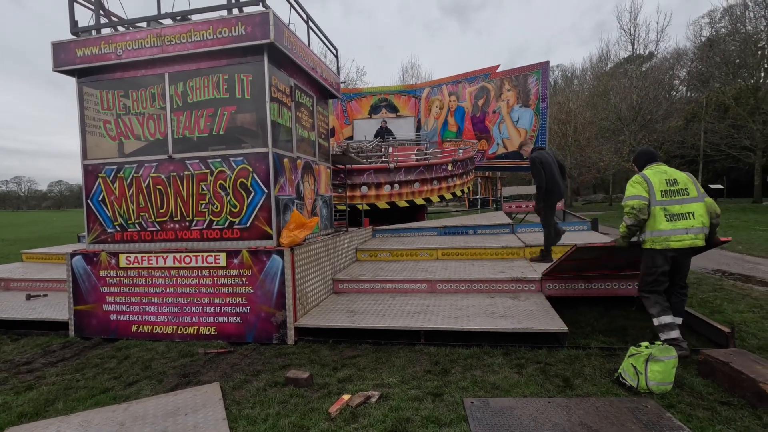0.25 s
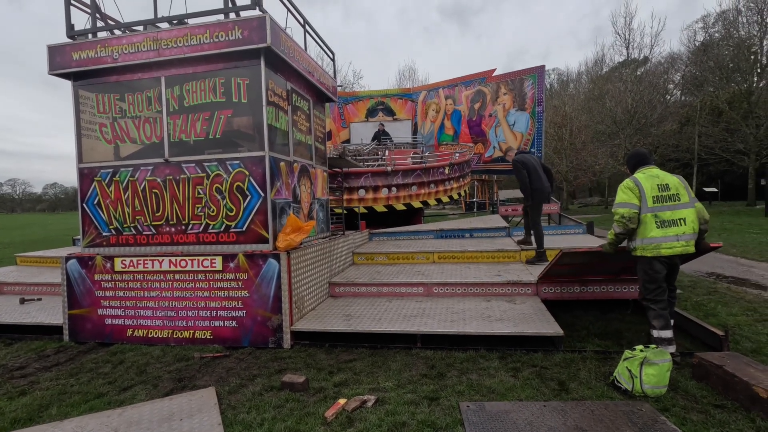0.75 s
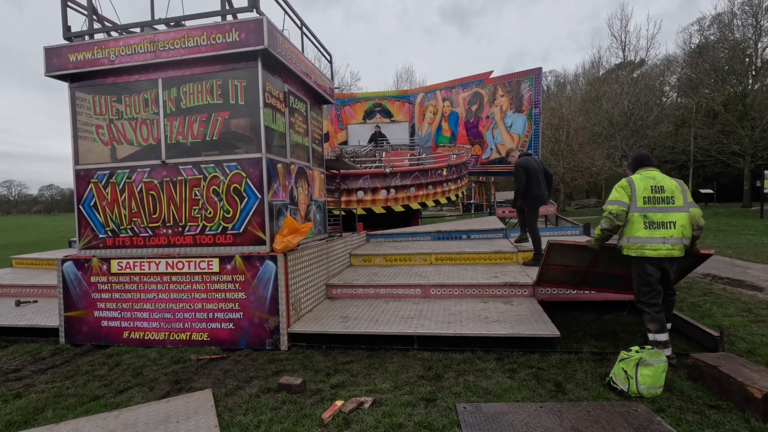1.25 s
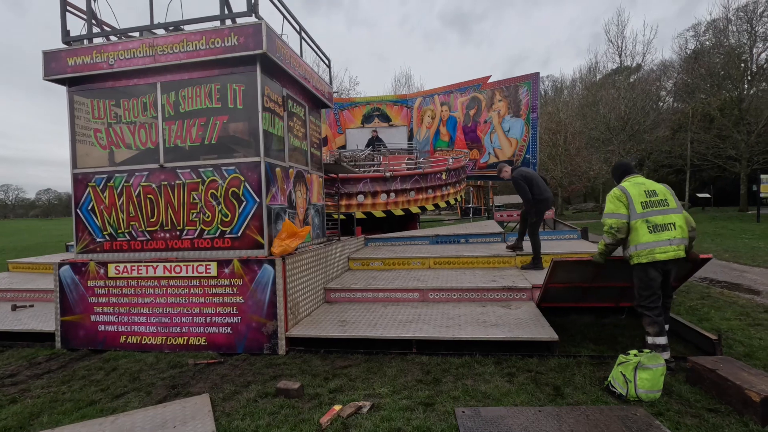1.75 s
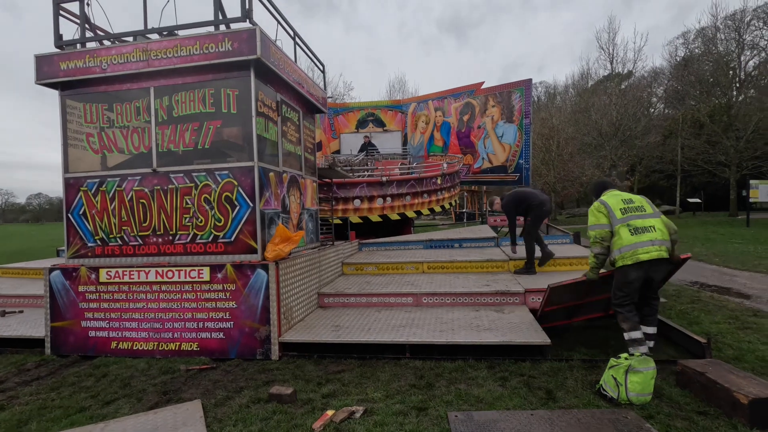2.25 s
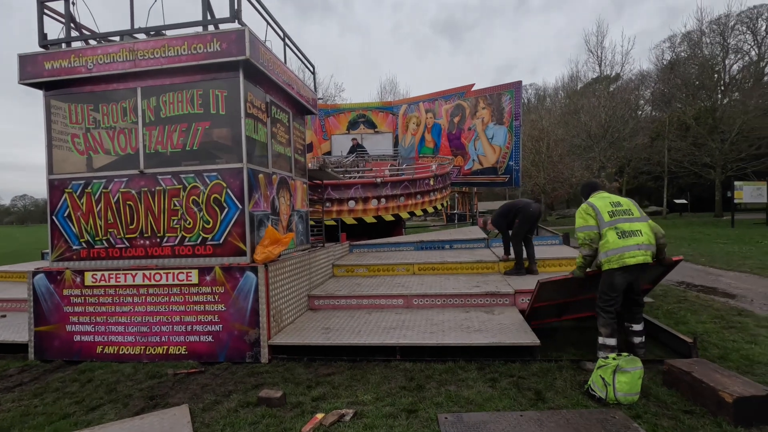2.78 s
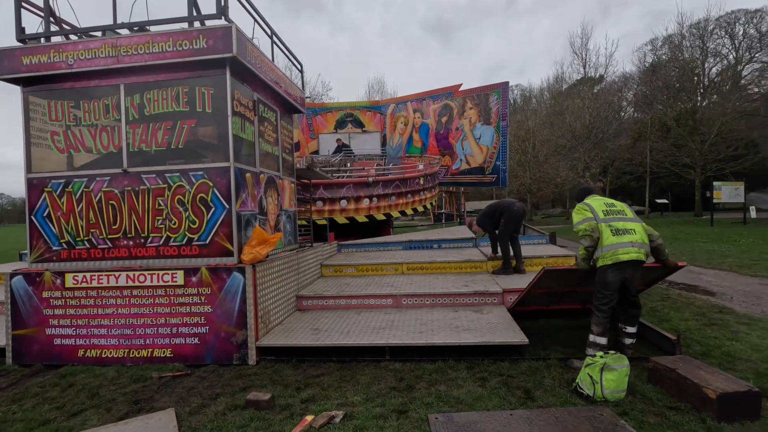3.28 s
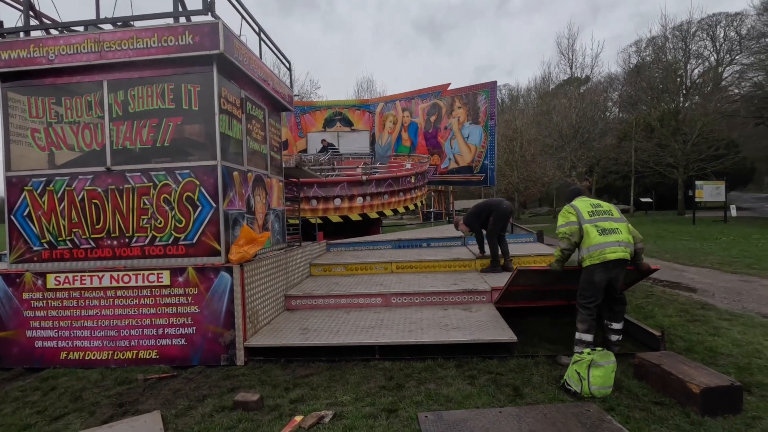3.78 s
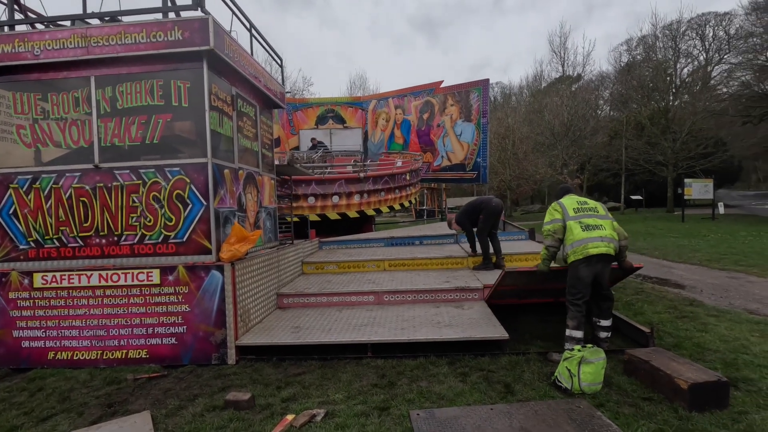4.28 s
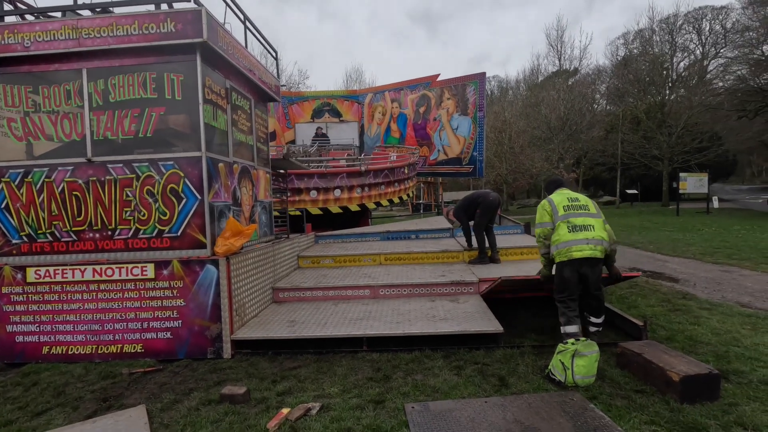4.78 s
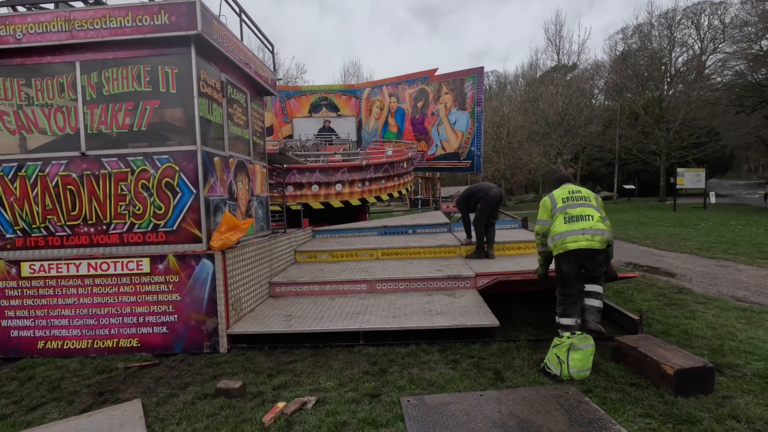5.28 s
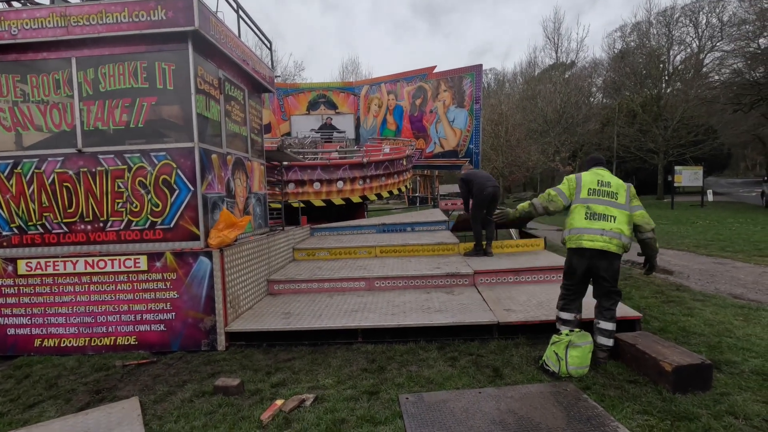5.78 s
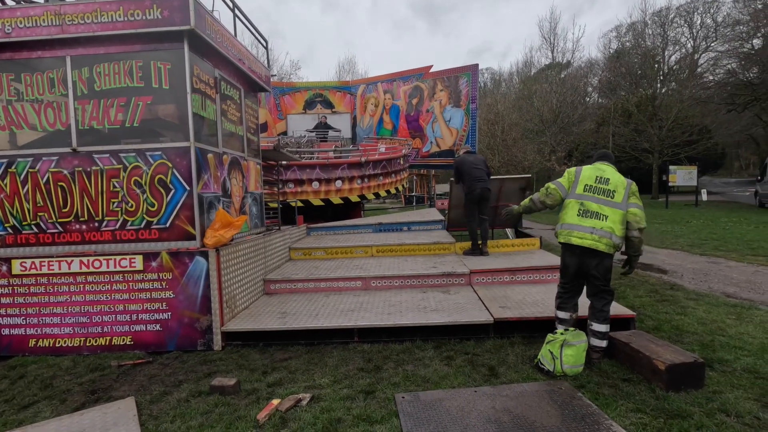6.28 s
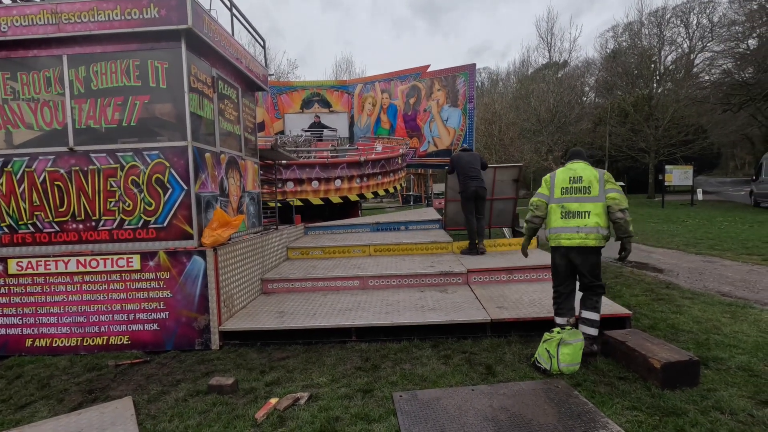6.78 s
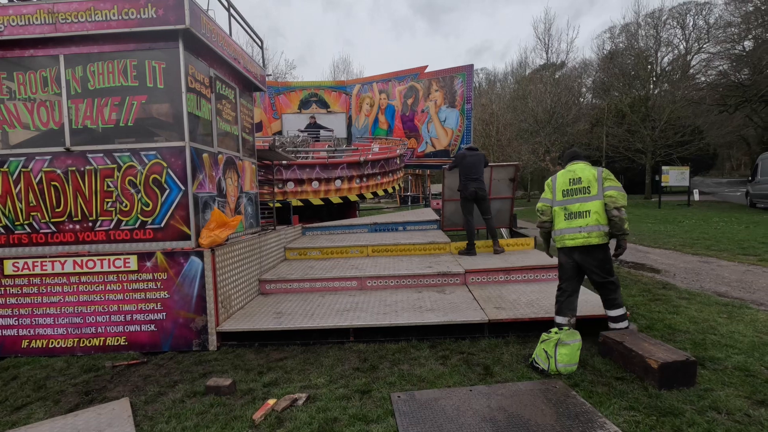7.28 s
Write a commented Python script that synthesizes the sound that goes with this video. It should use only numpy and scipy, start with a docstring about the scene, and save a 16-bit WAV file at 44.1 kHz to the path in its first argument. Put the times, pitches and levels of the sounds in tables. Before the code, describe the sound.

Steel deck plates are handled in front of a stereo microphone in an open park, over a low rumble of distant traffic and a faint, steady motor whine. Each knock booms, rings and chatters briefly, with short echoes off a fairground ride's walls. A loud bang comes at 0.6 seconds, then a cluster of clangs from about 1.4 to 2.2 seconds. A joint gives one short squeak at 2.6 seconds. Knocks resume at 3.5 seconds, bunch around 4.1 to 4.3, and hit hard at 4.7. A very faint, thin bird whistle slides down at 4.5 seconds. The sound, centred until now, widens from about 5 seconds. A sharp crash at 5.6 seconds starts a busy clatter that dies away by 6.7, with a loose pin rattling twice around 6.5. Two soft, low thuds follow at 7.3 seconds.

```python
"""Open park, a stereo microphone facing a fairground ride where workers drop and shove steel deck plates
into place. Far traffic and a faint motor whine run throughout. From the first second, each knock sets a
loose plate chattering, booming and ringing, with echoes off the ride's walls. A joint squeaks at 2.6 s,
the knocks resume, and at 4.5 s a small bird whistles from the trees. The image then opens out, a pin
rattles twice around 6.5 s, and two soft thuds end the work at 7.3 s."""
import sys
import numpy as np
from scipy import signal
from scipy.fft import rfft, irfft
from scipy.io import wavfile
from scipy.ndimage import uniform_filter1d

SR = 44100
rng = np.random.default_rng(int(sys.argv[2]) if len(sys.argv) > 2 else 0)


def wrap_up_sound(samples):
    """Save the sound to the file named by the first command line argument, as 16-bit audio."""
    columns = np.atleast_2d(samples).T
    # keep every value between -1 and 1, then stretch to whole-number steps
    tamed = np.clip(columns, -1, 1)
    steps = np.round(tamed * 32767).astype(np.int16)
    wavfile.write(sys.argv[1], SR, steps)


N = 332822

# Knocks on the deck: t/s, clang level/dB, boom, body and rim ring (each /dB re clang), settling time/s
KNOCKS = [(0.083, -51, 19, 15.5, -20, 0.092), (0.135, -58, 15, 20, -20, 0.1),
          (0.606, -19.5, 5, 0, -10, 0.4), (0.695, -37, 12, 4, -8, 0.2), (0.729, -42, 5, 3, 1, 0.3),
          (1.084, -43.5, -6, 0, -10, 0.14), (1.152, -47, 14.5, 9, -8, 0.33),
          (1.188, -46.5, 20.5, 7.5, -20, 0.51), (1.314, -40, 3, -24, 0, 0.47),
          (1.341, -44, -5, -21, -2, 0.26), (1.378, -40, -2, -13, -6, 0.2), (1.394, -20, 9, 0, -24, 0.46),
          (1.547, -26, 7.5, -2, -18, 0.23), (1.613, -24, 9, 1, -21, 0.27),
          (1.633, -24.5, 0, -1.5, 4.5, 0.78), (1.708, -28.5, 10.5, 1, -9, 0.57),
          (1.856, -26, 9, 0, -4, 0.41), (1.943, -37.5, 8.5, -3, 2, 0.63), (2.196, -35, 11, 2.5, -2.5, 0.15),
          (2.441, -51, -3, 10, -10, 0.4), (3.453, -28, 4, -0.5, 0, 0.3), (3.497, -37, 13, 6, 1, 0.22),
          (3.544, -48, 19, 7.5, 1, 0.9), (3.907, -51, 23, 14, -20, 0.27),
          (3.928, -43.5, 16.5, 4, -20, 0.45), (4.048, -43.5, 15.5, 3.5, -20, 0.56),
          (4.098, -26, 11.5, 6, -20, 0.26), (4.159, -30.5, 15.5, -1, 0.5, 0.17),
          (4.218, -41, 15, 0, -6, 0.55), (4.265, -27.5, 10.5, 1.5, -0.5, 0.27),
          (4.353, -53.5, 21, -9, -1, 0.43), (4.717, -21.5, 3.5, -2, -5, 0.42), (4.783, -28, 11, 0, 2, 0.12),
          (4.848, -40.5, 8, 5, -8, 0.091), (5.018, -35.5, -2, 4, -17, 0.27),
          (5.068, -44.5, 6, 1.5, -20, 0.54), (5.275, -49, 6, -9, -18, 0.35),
          (5.424, -48, 17, -13.5, -20, 0.11), (5.555, -46.5, 14, -15, -11, 0.76),
          (5.61, -19, 4, -12, -18, 0.38), (5.626, -19, -1, 0, 7, 0.33), (5.718, -32, 3.5, 1.5, -9, 1),
          (5.832, -31, 0, 4, -9, 0.99), (5.894, -24, 4, 1.5, 1, 0.41), (5.957, -32, -10, 5, -19, 0.52),
          (6.08, -31.5, 1, 1, -4, 0.37), (6.113, -34, 1.5, 5.5, -20, 0.17), (6.196, -36, 5.5, 0, -15, 0.37),
          (6.221, -41.5, 1, -2.5, -3, 0.28), (6.334, -49, 4, 17, -4, 0.14),
          (6.364, -42.5, 4, 0.5, -1, 0.23), (6.489, -35, -8, 2, -20, 0.15), (6.55, -48, 0, 3, -5, 0.3),
          (6.596, -44, 11, 4, -22, 0.38), (6.654, -54, 11, 10.5, -22, 0.75),
          (7.276, -64.5, 32, 22, -20, 0.16), (7.314, -64, 33, 19, -20, 0.21)]
# Colour of the steel's clang: f/Hz, level/dB
CLANG_SPECTRUM = [(880, -30), (1500, -2.5), (1770, -6), (2070, -6), (2490, -5.5), (4480, -7.5),
                  (6370, -22.5), (10200, -34.5), (13300, -66), (14500, -51), (15500, -62)]
# Ring time of the plate modes: f/Hz, t60/s
MODE_DECAY = [(60, 0.063), (300, 0.075), (1000, 0.05), (4000, 0.019), (12000, 0.068)]
# Boom of the whole sheet, its pitch set by how it is propped: from t/s, f/Hz
BOOM_PITCH = [(0, 220), (1.0, 150), (3.0, 230), (4.0, 160), (4.5, 244), (4.9, 150), (5.6, 209), (5.7, 160)]
# Jolts to a loose pin: t/s, level/dB
RATTLES = [(6.365, -33), (6.552, -38)]
# Partials of the joint: multiple of SQUEAK_HZ, level/dB re SQUEAK_DB, t60/s
SQUEAK_PARTIALS = [(1, -2.5, 0.098), (2, -5.5, 0.16), (4, -28, .08)]
# Bird's glide, sung 2 % below these pitches: t/s, length/s, first f/Hz, last f/Hz, level/dB
BIRD_GLIDES = [(4.522, 0.28, 5040, 4800, -69)]
# Partials of the motor: multiple of MOTOR_HZ, level/dB
MOTOR_PARTIALS = [(8, -68), (10, -73), (11, -78), (12, -70), (13, -80), (15, -77), (16, -86), (18, -79.5),
                  (19, -83), (20, -89), (21, -78.5), (22, -89), (24, -84), (26, -84), (27, -85),
                  (29, -83.5)]
# Colour of the far traffic: f/Hz, relative level/dB
TRAFFIC_SPECTRUM = [(12, -18), (20, -7.5), (59, 0), (153, -7), (213, -10), (232, -19.5), (289, -13),
                    (382, -26.5), (881, -31.5), (1340, -39), (2210, -47), (2400, -48.5), (2920, -47.5),
                    (6190, -61.5), (15500, -80.5)]
# Swell of the far traffic: t/s, level/dB, extra lift from 600 Hz up/dB
TRAFFIC_SWELL = [(0.0, -26, 9.5), (0.1, -28.5, 6.5), (1.16, -31, 7), (1.64, -24.5, 13.5), (2.46, -31, 2),
                 (3.19, -29, 3), (3.91, -29, 3.5), (4.2, -28.5, 2), (5.0, -32.5, 6), (5.78, -29, 4.5),
                 (6.62, -31, 4.5), (6.85, -26.5, -0.5), (7.12, -32, 2.5), (7.55, -28, 4)]
# Dying time of the wall echoes: f/Hz, t60/s
ECHO_DECAY = [(200, 0.53), (2000, 0.15), (10000, 0.26)]
# Phase between the microphone's ports, before the width gain: f/Hz, approximate left lead/rad
LEFT_LEAD = [(150, -0.18), (1000, -0.34), (2500, -0.87), (4500, -1.26), (8000, -0.86)]
# Diffuse sound in the side signal, before the width gain: f/Hz, level/dB
DIFFUSE_SIDE = [(40, -9), (150, -20), (1000, -11), (2500, -26), (8000, 3.5)]
# Width gain on the side signal: t/s, level/dB
STEREO_WIDTH = [(0, -58), (4.4, -41), (5.1, -7), (6.8, 0.5), (7.55, -22)]

CHATTER_HOLD = 0.046  # share of the settling time before the chatter falls steeply
RIM_HZ, RIM_WIDTH_HZ = 4425, 360  # the struck edge rings here
RIB_HZ, RIB_WIDTH_HZ, RIB_DB = 2080, 220, -8  # a stiffening rib rings along with the body
RATTLE_HZ, RATTLE_GAP_S, RATTLE_T60_S = 4350, 0.013, .025
SQUEAK_S, SQUEAK_HZ, SQUEAK_DB, SQUEAK_RISE_S = 2.626, 600, -25, 0.018
MOTOR_HZ = 283
WIDE_HZ, CUTOFF_HZ = 11400, 15100  # left and right always differ above the first; the second ends the top


def deck_plates():
    """In front of the microphone: each blow and its re-contacts ring a steel plate at three spots."""
    hz, modes = plate_modes(count=600)
    out, t, size = np.zeros(N), np.arange(11800) / SR, 2 ** 14
    bass, treble = hz < 500, hz > 7000
    for s, db, boom_db, body_db, rim_db, settle_s in KNOCKS:
        strength = mode_strengths(hz, s, boom_db, body_db)
        spots = strength * rng.choice([-1, 1], (3, len(hz))) * rng.uniform(.6, 1.4, (3, len(hz)))
        drive = chatter(t, settle_s)
        sway = drive * (1 - np.exp(-t / 0.007))  # the whole sheet needs time to start booming
        drive[:, [0, 90, 200]] += np.diag([2., 5., 6.])  # a faint lead-in softens the start of each knock
        sharp = drive * gain_of(-80 * t)  # later contacts are softer and excite less treble
        spectrum = 0
        for force, band in [(sway, bass), (drive, ~bass & ~treble), (sharp, treble)]:
            spectrum += (rfft(force, size) * rfft((spots * band) @ modes, size)).sum(0)
        strikes = rfft(sharp[0] * gain_of(-150 * t) + 18 * (t == t[90]), size)
        rings = [(RIM_HZ, RIM_WIDTH_HZ, rim_db), (RIB_HZ, RIB_WIDTH_HZ, RIB_DB + min(body_db, 8))]
        for ring_hz, width_hz, ring_db in rings:
            cluster = np.exp(-((hz - ring_hz) / width_hz) ** 2) * spots[0]  # a few neighbouring modes
            spectrum += gain_of(ring_db) * strikes * rfft(cluster @ modes / np.linalg.norm(cluster), size)
        add(out, s, gain_of(db) * irfft(spectrum, size))
    return out


def plate_modes(count):
    """A thin plate has densely packed modes; each is a dying sine of energy 1."""
    hz = 50 + 15000 * ((np.arange(count) + rng.random(count)) / count) ** 1.4
    t = np.arange(4500) / SR
    modes = gain_of(-60 * t / at_hz(MODE_DECAY, hz)[:, None]) * np.sin(2 * np.pi * hz[:, None] * t)
    return hz, modes / np.linalg.norm(modes, axis=1)[:, None]


def mode_strengths(hz, s, boom_db, body_db):
    """How hard the knock at s seconds drives each mode: low boom, middle body, high clang."""
    boom_hz = [f for start, f in BOOM_PITCH if start <= s][-1]
    boom = [(boom_hz / 4, boom_db - 12.5), (boom_hz / 1.67, boom_db + 9),
            (boom_hz, boom_db + 12), (boom_hz * 1.556, boom_db + 7.5)]
    body = [(520, body_db + 1), (760, body_db + 2.5), (950, body_db + 4), (1200, body_db - 2.5)]
    clang = [(f, db) for f, db in CLANG_SPECTRUM if f >= 1500]
    strength = gain_of(at_hz(boom + body + clang, hz)) * np.sqrt(np.gradient(hz))
    return strength / np.linalg.norm(strength[(hz > 1500) & (hz < 8000)])


def chatter(t, settle_s):
    """A loose plate re-contacts at three spots, each about 500 times a second, fading as it settles."""
    sizes = gain_of(2.4 * np.minimum(rng.exponential(1, (3, len(t))), 4))
    contacts = sizes * (rng.random(sizes.shape) < 500 / SR)
    settling = np.maximum(t / settle_s - CHATTER_HOLD, 0) ** 1.103
    envelope = (1 - np.exp(-t / 0.002)) * gain_of(-60 * settling - 28.3 * t)
    force = contacts * rng.choice([-1, 1], contacts.shape) * envelope
    force /= np.linalg.norm(force, axis=1, keepdims=True) + 1e-9
    return force * np.linalg.norm(envelope) / np.sqrt(3)


def loose_pin():
    """On the ride, a jogged pin bounces three times in its hole: short pings of three close modes."""
    out, t = np.zeros(N), np.arange(900) / SR
    for s, db in RATTLES:
        for bounce in range(3):
            hz = RATTLE_HZ * rng.uniform(.9, 1.1, (3, 1))
            ping = gain_of(db - 60 * t / RATTLE_T60_S) * np.sin(2 * np.pi * hz * t).mean(0)
            add(out, s + bounce * RATTLE_GAP_S, ping)
    return out


def joint_squeak():
    """On the ride, a joint sticks and slips with a thin scrape on top; the second partial rings on."""
    t = np.arange(0, .2, 1 / SR)
    shake, uneven, grit = rng.standard_normal((3, len(t)))
    shake = unit_rms(uniform_filter1d(uniform_filter1d(shake, 150), 60))
    turns = np.cumsum(SQUEAK_HZ * (1 + 0.0086 * shake)) / SR
    rise, after = np.minimum(t / SQUEAK_RISE_S, 1), np.maximum(t - SQUEAK_RISE_S, 0)
    slips = sum(gain_of(db - 60 * after / t60) * np.sin(2 * np.pi * k * turns)
                for k, db, t60 in SQUEAK_PARTIALS)
    slips *= 1 + 0.2 * unit_rms(uniform_filter1d(uniform_filter1d(uneven, 90), 60))  # uneven in size
    scrape = signal.sosfilt(signal.butter(10, [1800, 5100], "band", fs=SR, output="sos"), grit)
    return gain_of(SQUEAK_DB) * rise * (slips + gain_of(-13.5 - 60 * after / .1) * scrape)


def wall_echoes(x):
    """Sparse echoes off the ride's walls; the bass lasts longest."""
    taps = np.zeros(SR // 2)
    slots = np.arange(400, SR // 2 - 20, 20)
    taps[slots + rng.integers(0, 20, len(slots))] = rng.choice([-1., 1.], len(slots))
    hz, t, spectra = signal.stft(taps, SR, nperseg=256)
    decay = gain_of(-60 * t / at_hz(ECHO_DECAY, hz)[:, None])
    tail = signal.istft(spectra * decay, SR, nperseg=256)[1]
    return signal.fftconvolve(x, tail / np.linalg.norm(tail))[:N]


def bird():
    """Off in the trees, a small bird gives a thin, faint whistle that slides down."""
    out = np.zeros(N)
    for s, length, first_hz, last_hz, db in BIRD_GLIDES:
        add(out, s, tone([(s, first_hz, db), (s + length, last_hz, db)], [(0.98, 0)], wobble=.012))
    return out


def motor_whine():
    """Faint behind the work, a motor whines in high harmonics of a nearly steady pitch."""
    return tone([(0, MOTOR_HZ, 0), (N / SR + 0.086, MOTOR_HZ, 0)], MOTOR_PARTIALS, wobble=0.0004)[:N]


def far_traffic():
    """Traffic and engines far across the park: low noise that swells, with drifting patches of colour."""
    frames, hz = N // 256 + 5, np.fft.rfftfreq(1024, 1 / SR)
    t = np.arange(frames) * 256 / SR
    real, imag, patches = rng.standard_normal((frames, 513, 3)).T
    patches_db = 0.99 * unit_rms(uniform_filter1d(uniform_filter1d(patches, 10, 0), 14, 1))
    spectra = (real + 1j * imag) * gain_of(at_hz(TRAFFIC_SPECTRUM, hz)[:, None] + patches_db)
    rms = np.sqrt(np.mean(signal.istft(spectra[:, :300], nperseg=1024, noverlap=768)[1] ** 2))
    s, level_db, lift_db = np.transpose(TRAFFIC_SWELL)
    lift = np.interp(t, s, lift_db) * np.clip(np.log2(hz / 300 + 1e-9), 0, 1)[:, None]
    spectra *= gain_of(np.interp(t, s, level_db) + lift) / rms
    return signal.istft(spectra, nperseg=1024, noverlap=768)[1][:N]


def tone(path, partials, wobble):
    """Slightly unsteady partials (multiple, level/dB) along a path of (t/s, f/Hz, level/dB)."""
    s, hz, db = np.transpose(path)
    t = np.arange(s[0], s[-1], 1 / SR)
    shake = unit_rms(uniform_filter1d(rng.standard_normal(len(t)), 150))
    turns = np.cumsum(np.interp(t, s, hz) * (1 + wobble * shake)) / SR
    stack = sum(gain_of(level) * np.sin(2 * np.pi * k * turns) for k, level in partials)
    return np.sqrt(2) * gain_of(np.interp(t, s, db)) * stack * signal.windows.tukey(len(t), .2)


def gain_of(db):
    """Decibels to gain."""
    return 10 ** (np.asarray(db) / 20)


def unit_rms(x):
    """Scales to rms 1."""
    return x / np.sqrt(np.mean(x ** 2) + 1e-20)


def at_hz(points, hz):
    """Reads a table on a log-frequency axis."""
    f, value = np.transpose(points)
    return np.interp(np.log(hz + 1), np.log(f + 1), value)


def add(mix, s, sound):
    """Mixes a sound in at s seconds."""
    part = mix[round(s * SR):][:len(sound)]
    part += sound[:len(part)]


def scene():
    """One channel for what stands in front of the microphone, one for the diffuse park around it."""
    near = deck_plates() + loose_pin()
    add(near, SQUEAK_S, joint_squeak())
    front = near + motor_whine() + gain_of(-14.5) * wall_echoes(near) + bird() + far_traffic()
    diffuse = gain_of(-16) * wall_echoes(near) + far_traffic()
    return np.array([front, diffuse])


def record(dry):
    """Stereo microphone: left and right are front plus and minus side; gain control squeezes bangs."""
    hz, t, (front, diffuse) = signal.stft(dry, SR, nperseg=512)
    side = 1j * np.sin(at_hz(LEFT_LEAD, hz) / 2)[:, None] * front
    side += gain_of(at_hz(DIFFUSE_SIDE, hz))[:, None] * diffuse
    side *= gain_of(np.interp(t, *np.transpose(STEREO_WIDTH)))
    scattered = front * np.exp(2j * np.pi * rng.random(front.shape)) * gain_of(2)
    side = np.where(hz[:, None] > WIDE_HZ, scattered, side)
    ports = signal.istft(np.array([front + side, front - side]), SR, nperseg=512)[1][:, :N]
    power_db = 10 * np.log10(abs(uniform_filter1d((ports ** 2).mean(0), 300)) + 1e-12)
    release_db = np.arange(N) * 60 / SR  # the held peak falls 60 dB a second
    held_db = np.maximum.accumulate(power_db + release_db) - release_db
    over_db = np.maximum(held_db + 19, 0)  # threshold -19 dB
    ducked = ports / gain_of(0.18 * uniform_filter1d(over_db, 200))
    dulled = signal.lfilter(*signal.butter(2, 12000, fs=SR), ducked)  # the microphone dulls the top
    clipped = .95 * np.tanh(dulled / .95)  # soft overload
    lowpass = signal.firwin(1023, CUTOFF_HZ, window=("kaiser", 10), fs=SR)
    return signal.oaconvolve(clipped, lowpass[None], "same")


dry = scene()
out = record(dry)
wrap_up_sound(out)
```